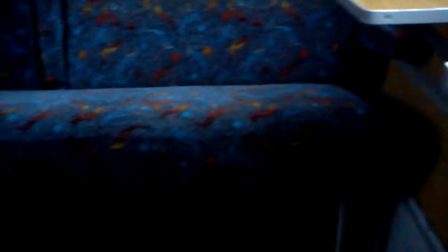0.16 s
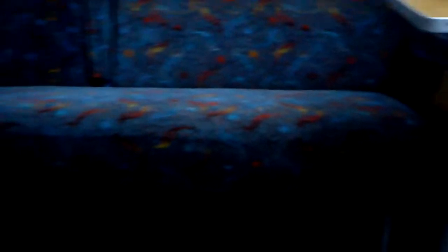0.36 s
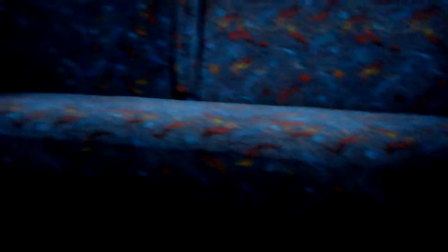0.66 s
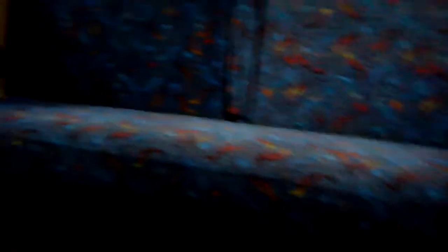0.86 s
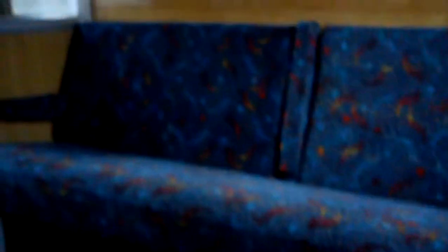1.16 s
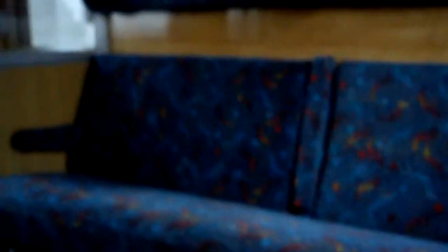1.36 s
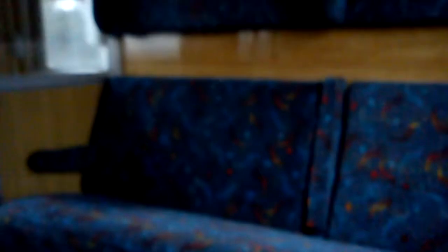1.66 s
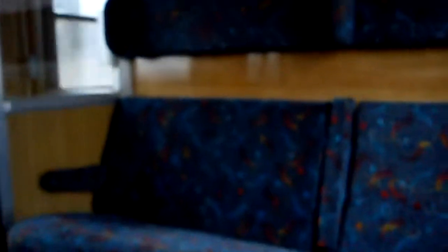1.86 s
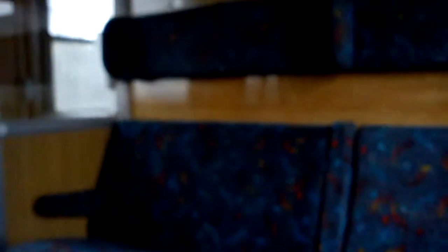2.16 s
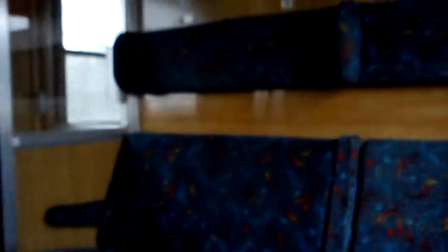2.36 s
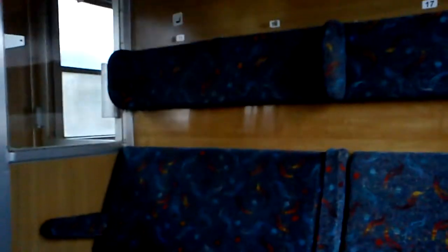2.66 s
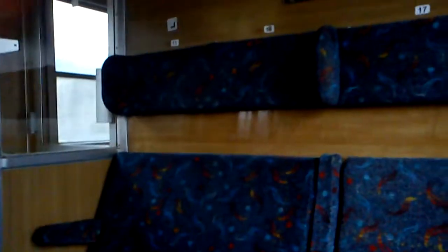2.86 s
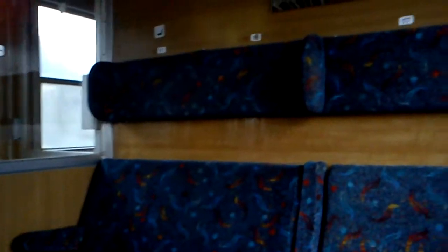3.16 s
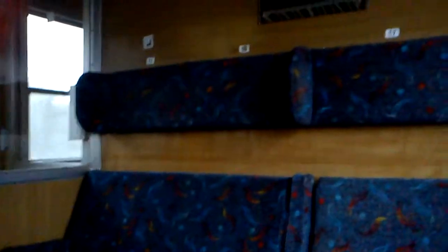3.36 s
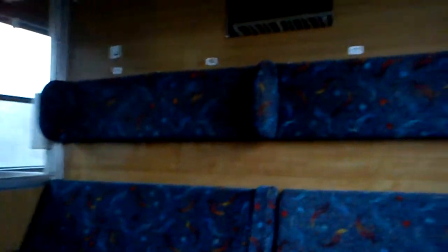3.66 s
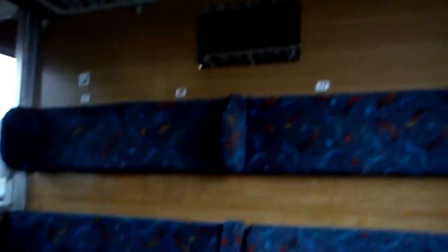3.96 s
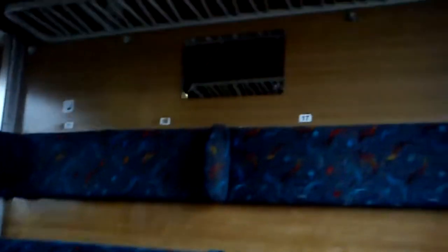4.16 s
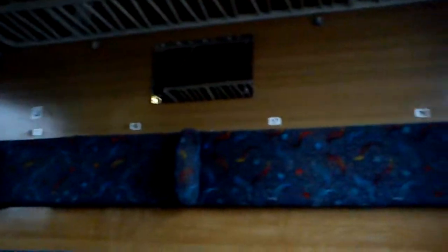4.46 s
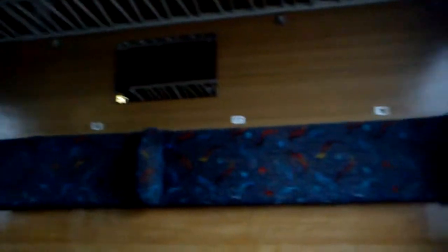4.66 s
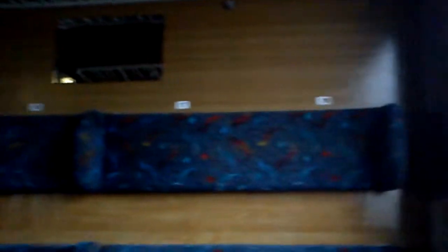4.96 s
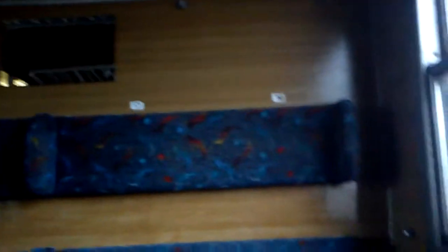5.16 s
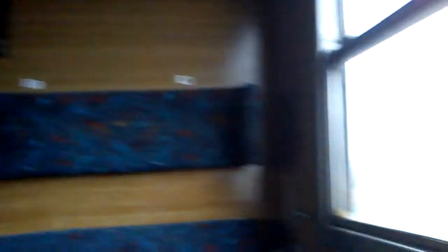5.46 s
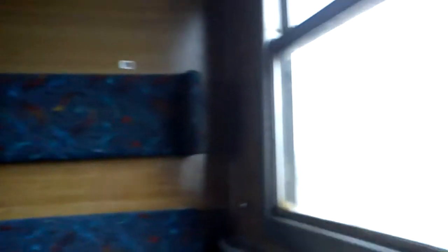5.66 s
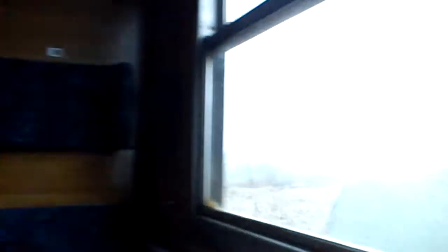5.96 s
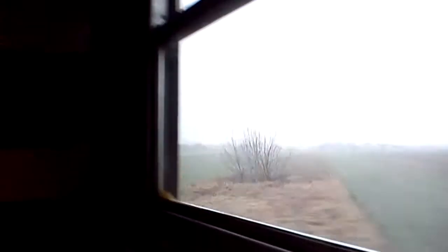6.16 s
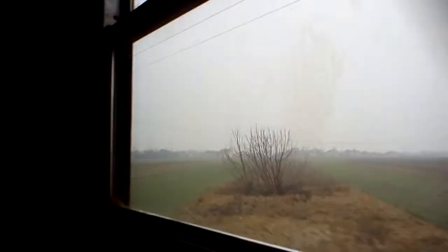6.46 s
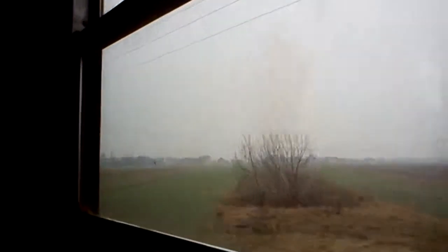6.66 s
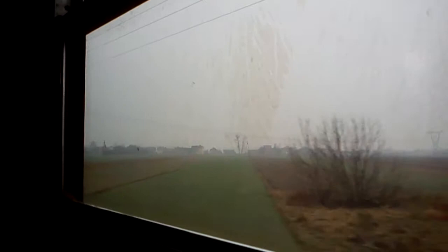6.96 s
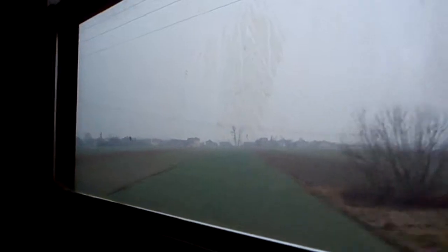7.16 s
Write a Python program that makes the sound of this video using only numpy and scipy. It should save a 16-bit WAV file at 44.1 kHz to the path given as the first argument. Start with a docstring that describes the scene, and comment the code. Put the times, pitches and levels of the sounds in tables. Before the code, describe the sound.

A deep, wavering rumble fills a passenger carriage as steel wheels roar and faintly sing, bogies thud on joints, and close hand rustles appear late.

```python
"""A low, uneven booming fills the compartment of a passenger train running at steady speed.
Jolts drive the carriage body in its low modes (filtered noise and short tones); the wheels roar and
sing on the rails (noise in resonances, wavering tones). Bogies thud over rail joints, mostly about once
a second (decaying partials and a noise knock). Part way through, corrugated rail adds a growl and the
window hiss grows; a few ticks and soft hand rustles sound close by, at a two-port hand-held microphone."""
import sys
import numpy as np
from scipy import signal
from scipy.fft import rfft, irfft
from scipy.io import wavfile
from scipy.ndimage import uniform_filter1d

SR = 44100
rng = np.random.default_rng(int(sys.argv[2]) if len(sys.argv) > 2 else 0)


def to_wav(s):
    """Save 16-bit WAV."""
    ch = np.atleast_2d(s).T  # columns
    pcm = np.round(np.clip(ch, -1, 1) * 32767)  # PCM
    wavfile.write(sys.argv[1], SR, pcm.astype(np.int16))


N = 322812
TIME, HZ = np.arange(N) / SR, np.fft.rfftfreq(N, 1 / SR)

# phase by which the left port leads: f/Hz, phase/rad
PORT_LEAD = [(20, -.2), (120, -.19), (450, -.08), (900, -.05), (1250, .8), (1550, 2.4), (1950, 3.1),
             (2300, 4.7), (2650, 6), (3200, 9.3)]
# level of the left port over the right: f/Hz, level difference/dB
PORT_BALANCE = [(30, 3.8), (85, 2.1), (140, .4), (260, 1.5), (700, .6), (1500, -.2), (2300, -.2),
                (2900, 2.8), (4000, 5), (4700, 2.5), (6000, 11), (7000, 15), (9500, 17)]


def body():
    """Forced vibration: uneven track heaves the sprung carriage and keeps floor and cabin modes rumbling."""
    # spectrum of the heaving body: f/Hz, relative level per Hz/dB
    shudder_spectrum = [(4, -24), (11, -8), (22, -4), (31, -6), (39, 2), (46, -6), (58, -16), (80, -35),
                        (300, -130)]
    # modes of the floor: f/Hz, nominal width/Hz, relative level/dB
    floor_modes = [(67, 8.8, -2.5), (89.2, 17, 2)]
    # drumming of the floor: t/s, level/dB
    floor_level = [(0, -28), (1.9, -34.5), (2.2, -27.5), (2.6, -31), (4.07, -27), (4.58, -32), (5.1, -28),
                   (7.32, -26.5)]
    # low, high and fainter upper modes of the cabin: f/Hz, nominal width/Hz, relative level/dB
    low_modes = [(117.3, 11.7, 1.5)]
    high_modes = [(154.4, 15.3, 0)]
    upper_modes = [(240, 7.2, -10.5), (251, 23, -1.5), (332, 22, -2)]
    # levels of the same three, the lower two between their booms: t/s, level/dB
    low_level = [(0, -30), (.75, -31), (1.12, -32.5), (1.45, -26.5), (2.2, -27), (2.9, -25.5), (3.38, -26),
                 (4.2, -25.5), (5.88, -28), (7.32, -26.5)]
    high_level = [(0, -31.5), (2.4, -32), (2.88, -32.5), (3.68, -35.5), (4.0, -26.5), (4.8, -31.5),
                  (7.32, -27)]
    upper_level = [(0, -47.5), (1.7, -45.5), (3.0, -46), (5.0, -44), (7.32, -48.5)]

    shudder = noise(gain_of(read(shudder_spectrum)), steady=.6, span_s=.2) * gain_of(-28.5)
    drumming = noise(resonances(floor_modes), steady=.6, span_s=.2) * level(floor_level)
    drone = noise(resonances(low_modes), steady=.65, span_s=.2) * level(low_level)
    hum = noise(resonances(high_modes), steady=.65, span_s=.2) * level(high_level)
    upper = noise(resonances(upper_modes), steady=0.44, span_s=0.55) * level(upper_level)
    return shudder + drumming + drone + hum + upper


def booms(length_s=0.066, spread=0.33):
    """Transient modal response: a jolt pumps up one body mode, which swells and dies away."""
    # jolts, as a deep heave or in a cabin mode: t/s of the middle, f/Hz, RMS level at the peak/dB
    jolts = [(.42, 160, -22.5), (.45, 118.7, -17), (0.561, 123.6, -21.5), (0.591, 149.8, -24),
             (0.949, 90.3, -24.5), (1.489, 159, -26.5), (2.06, 118.7, -22.5), (2.16, 38, -21.5),
             (2.37, 90.3, -24), (2.43, 124, -21), (2.44, 155, -24), (2.648, 120, -24), (3.121, 37.2, -22),
             (3.33, 157, -19.5), (3.35, 178, -29.5), (4.15, 183, -30), (3.648, 117, -21.5),
             (3.802, 118.4, -25.5), (3.871, 38.5, -22), (3.951, 115.5, -21.5), (4.21, 39.4, -21.5),
             (4.429, 39.8, -22), (4.679, 38.8, -23), (5.13, 40.8, -24), (5.17, 162, -21.5),
             (5.22, 116.4, -22.5), (5.479, 145.6, -21.5), (5.54, 40, -21), (5.592, 119.3, -20.5),
             (5.59, 152.5, -20), (6.031, 40.4, -21.5), (6.11, 163, -24), (6.28, 118, -22),
             (7.01, 121, -18.5), (7.13, 39.7, -17.5), (7.22, 146.5, -21)]
    out = np.zeros(N)
    for (s, hz, db), turn in zip(jolts, rng.random(len(jolts))):
        near = abs(TIME - s) < .5
        t = TIME[near] - s
        # length_s holds at 100 Hz; deeper booms last longer
        age = t / length_s * (hz / 100) ** spread
        tone = np.sin(2 * np.pi * (hz * t + turn))
        out[near] += gain_of(db) * tone * np.exp(-2 * age ** 2)
    return np.sqrt(2) * ports(out)


def rolling():
    """Roughness excitation: steel rolling on steel gives a broad roar in which rails and wheels ring."""
    # spectrum of the roar: f/Hz, relative level per Hz/dB
    roar_spectrum = [(100, -14), (200, -14), (260, 1.5), (420, 0), (600, 0), (800, 3), (960, 0.5),
                     (1250, 1), (1650, 1), (2000, -4.5), (2600, -25), (3400, -16), (9000, -110)]
    # ringing of rails and running gear, then of the wheels: f/Hz, nominal width/Hz, relative level/dB
    rail_modes = [(459, 12, 2), (549.4, 6.7, 4), (645, 21, -3.5), (704, 64, -3), (715, 5.1, -2),
                  (751, 18, 3), (782, 3.9, 2), (814, 26, 1), (850, 7.5, 0), (888, 74, -5), (1107, 24, 0.5)]
    wheel_modes = [(1366, 9.9, -5), (1407, 8, -1), (1431, 6.1, 2), (1470, 60, -1.5), (1607, 220, -8.5),
                   (1599, 6, 2.5), (2128, 11, -3.5)]
    # roughness of the rail head, as roar: t/s, relative level/dB
    roughness = [(0, -37), (1.35, -35.5), (1.68, -36.5), (2.0, -34.5), (2.35, -36), (3.5, -34), (5.5, -36),
                 (6.2, -35), (7.32, -36)]
    # how hard the rails ring: t/s, level/dB
    rail_level = [(0, -40.5), (1.6, -42), (3.4, -40), (3.95, -41.5), (4.35, -48), (4.7, -40), (5.4, -44.5),
                  (7.32, -43.5)]
    # how hard the wheels sing: t/s, relative level/dB
    wheel_level = [(0, -41), (.45, -38), (1.0, -40.5), (2.1, -41), (3.5, -44.5), (4.2, -42), (5.0, -41.5),
                   (5.3, -38.5), (7.32, -39)]

    flutter = gain_of(.5 * waver(rate=14))
    roar = gain_of(0.9) * noise(gain_of(read(roar_spectrum)), steady=0.9, span_s=0.36) * flutter
    rails = noise(resonances(rail_modes), steady=0.66, span_s=0.19)
    wheels = gain_of(-1.5) * noise(resonances(wheel_modes), steady=0.97, span_s=0.12)
    return roar * level(roughness) + rails * level(rail_level) + wheels * level(wheel_level)


def wheel_squeals():
    """Modal ringing: single wheel modes sing out for a while as thin tones."""
    # t/s of the start, t/s of the end, f/Hz, relative level/dB
    wheel_tones = [(.08, .58, 1430, -45), (1.1, 3.1, 1407, -49.5), (3.92, 4.75, 1599, -48.5),
                   (4.15, 5.1, 1431, -49.5), (5.16, 5.42, 1431, -43.5), (5.05, 5.85, 1475, -47),
                   (5.05, 6.05, 1464, -46.5), (6.27, 7.45, 1465, -44.5)]
    return gain_of(4.8) * singing(wheel_tones, wander_hz=1.4, flicker_db=5.0)


def rail_tones():
    """Modal ringing: single rail modes ring out for a while as thin tones."""
    # t/s of the start, t/s of the end, f/Hz, relative level/dB
    rail_notes = [(1.75, 2.7, 752, -48), (3.72, 4.32, 765, -46.5), (3.85, 4.18, 721, -46),
                  (4.12, 4.45, 810, -48), (4.4, 5.2, 776, -48), (4.5, 4.92, 766, -45),
                  (4.55, 4.87, 755, -45)]
    return gain_of(3.5) * singing(rail_notes, wander_hz=1.5, flicker_db=2.5)


def singing(notes, wander_hz, flicker_db, fade_s=0.044):
    """Narrow-band resonance: one mode of the steel rings as a tone wavering in pitch and strength."""
    out = np.zeros(N)
    wander = wander_hz * waver(rate=14)
    flicker = gain_of(flicker_db * waver(rate=10))
    # each note takes the wavering from another place
    for (start, end, hz, db), shift in zip(notes, rng.integers(0, N, len(notes))):
        gate = np.clip(np.minimum(TIME - start, end - TIME) / fade_s, 0, 1)
        phase = 2 * np.pi * np.cumsum(hz + np.roll(wander, shift)) / SR
        out += gain_of(db) * gate * np.roll(flicker, shift) * np.sin(phase)
    return ports(out)


def joints(thud_rise_s=0.011, knock_rise_s=0.014, detune=.02, pan_db=3.0):
    """Impact excitation: each axle drops into the rail gap; the bogie frame thuds, the running gear knocks."""
    # axles crossing joints, two to a bogie: t/s, thud level/dB, hard knock level/dB
    axles = [(0.388, -34, -56), (0.471, -25, -55), (2.215, -26, -41), (2.302, -26, -51),
             (3.223, -26.5, -46), (3.305, -23.5, -41), (4.096, -22, -49), (4.161, -25.5, -41),
             (5.07, -24, -35), (5.164, -29, -43), (6.085, -25.5, -41), (6.157, -30.5, -48),
             (6.995, -20, -35), (7.077, -26, -49)]
    # modes of the bogie frame: f/Hz, 60 dB decay time/s, relative level/dB
    bogie_modes = [(166.4, 0.18, 1), (187.7, 0.14, -4), (223.3, 0.15, -3.5), (251.5, 0.26, -2.5),
                   (286.6, .14, -5.5), (359, 0.095, -6.5)]
    # spectrum of the knock: f/Hz, relative level per Hz/dB
    knock_spectrum = [(120, -17), (370, 7), (530, 11), (900, -16), (4000, -69)]

    thuds, t = np.zeros((2, N)), np.arange(SR // 3) / SR
    hz, t60, mode_db = np.transpose(bogie_modes)[:, :, None]
    rise = np.tanh((t / thud_rise_s) ** 2)
    for s, db, _ in axles:
        stray, turn = rng.standard_normal((2, len(bogie_modes), 1))
        partials = np.sin(2 * np.pi * (hz * (1 + detune * stray) * t + turn))
        ring = gain_of(mode_db - 60 * t / t60) * partials
        add(thuds, s, ring.sum(0)[None] * rise, db, pan_db)
    blows = swell([(s, db) for s, _, db in axles], knock_rise_s)
    knocks = blows * noise(gain_of(read(knock_spectrum)), steady=0.44, span_s=.055)
    return thuds + knocks


def corrugation():
    """Roughness excitation: ripples on the rail head make the cabin growl, with a faint hum near 550 Hz."""
    # modes excited: f/Hz, nominal width/Hz, relative level/dB
    growl_modes = [(141.8, 11, 1.5), (167.8, 6.7, 0), (213, 20, -12.5), (553, 12, -21)]
    # the wheels run onto the corrugated stretch between 4.74 and 5.1 s
    ripple = gain_of(np.interp(TIME, (4.74, 5.1), (-39.3, -26.8)))
    return noise(resonances(growl_modes), steady=0.54, span_s=1.0) * ripple


def air():
    """Turbulent flow noise: the slipstream hisses along the window, louder once the microphone faces it."""
    # spectrum of the hiss: f/Hz, relative level per Hz/dB
    hiss_spectrum = [(800, -6.5), (2200, 11.5), (2900, 4), (4100, 4), (5000, -3), (5900, -8.5),
                     (7000, -26.5), (9500, -34.5), (11000, -72.5), (15000, -85.5)]
    away_db, window_db = -44.5, 3
    gusts = gain_of(.35 * waver(rate=12))
    # the microphone turns to the window between 3.7 and 5.2 s
    facing = np.interp(TIME, (3.7, 5.2), (0, 1))
    return noise(gain_of(read(hiss_spectrum))) * gusts * gain_of(away_db + window_db * facing)


def rustles():
    """Sliding friction: skin on the microphone housing gives short swells of fine uneven grains."""
    # hand strokes: t/s of the middle, level/dB, length/s, left over right/dB
    hand_strokes = [(4.61, -57.5, 0.022, -9.5), (5.73, -52, 0.036, 1.5), (5.857, -53, 0.017, 1),
                    (5.938, -58, 0.016, 7), (6.174, -56, 0.022, 9), (6.262, -62, 0.015, 17),
                    (6.364, -63, .03, 18), (6.463, -62, .025, 19), (6.568, -49.5, 0.049, 8),
                    (6.605, -49.5, 0.036, 5.5), (6.79, -60.5, 0.054, 15.5), (6.963, -61.5, 0.083, 18.5),
                    (7.03, -52, 0.038, 14.5)]
    # spectrum of skin on the housing: f/Hz, relative level per Hz/dB
    rub_spectrum = [(1500, -16), (4000, -3.5), (7000, 1), (9800, 1.5), (10800, -16.5), (12000, -31),
                    (15000, -41)]
    envelopes = []
    for side in (1, -1):
        surges = [(s, db + side * pan_db / 2, length_s) for s, db, length_s, pan_db in hand_strokes]
        envelopes.append(humps(surges))
    grip = gain_of(3 * waver(rate=220))
    rub = irfft(rfft(rng.standard_normal((2, N)) * grip) * gain_of(read(rub_spectrum)), N)
    return np.array(envelopes) * rub / rub.std()


def ticks(decay_s=0.0014, ring_db=-17, ring_s=0.016):
    """Light impact: small hard parts touch, each giving a sharp snap and a brief bright ring."""
    # contacts close by: t/s, relative level/dB, centre f/Hz, left over right/dB
    contacts = [(3.885, -42, 5200, -14), (4.024, -43, 5200, -7), (5.3584, -40, 10200, -24),
                (5.371, -51, 9500, -22)]
    out, t = np.zeros((2, N)), np.arange(SR // 20) / SR
    decay = np.exp(-t / decay_s) + gain_of(ring_db) * np.exp(-t / ring_s)
    onset = np.tanh(t / 0.00049)
    for s, db, centre_hz, pan_db in contacts:
        burst = bright(rng.standard_normal((2, len(t))), centre_hz, octaves=0.42)
        add(out, s, burst / burst.std() * decay * onset, db, pan_db)
    return gain_of(-3.0) * out


def gain_of(db):
    """Logarithmic level: decibels to amplitude."""
    return np.exp(np.asarray(db) * np.log(10) / 20)


def read(points):
    """Spectral envelope: a table interpolated over log frequency, at every bin."""
    hz, value = np.transpose(points)
    return np.interp(np.log(HZ + 1), np.log(hz + 1), value)


def level(points):
    """Level history: a curve of t/s, level/dB as a gain at every sample."""
    return gain_of(np.interp(TIME, *np.transpose(points)))


def resonances(modes):
    """Modal superposition: amplitude response of steep-sided resonances added in power."""
    power = 0
    for hz, width, db in modes:
        power = power + gain_of(db) ** 2 / (1 + ((HZ - hz) / (0.68 * width)) ** 2) ** 2
    return np.sqrt(power)


def waver(rate):
    """Random modulation: low-passed noise of unit spread, with its corner at rate in Hz."""
    drift = irfft(rfft(rng.standard_normal(N)) / (1 + (HZ / rate) ** 4), N)
    return drift / drift.std()


def noise(colour, steady=0., span_s=.15):
    """Partial coherence: coloured unit noise at two ports; steady (0-1) calms swells longer than span_s."""
    # likeness of the two ports: f/Hz, coherence 0-1
    port_likeness = [(40, .998), (160, .994), (380, .93), (550, .78), (760, .72), (1050, .44), (1400, .27),
                     (1900, .52), (2200, .3), (3200, .22), (4000, .04)]
    a, b = rng.standard_normal((2, 2 * len(HZ))).view(complex)
    same = np.clip(read(port_likeness), 0, 1)
    tilt = gain_of(read(PORT_BALANCE) / 2)
    right = (same * a + np.sqrt(1 - same ** 2) * b) * np.exp(-1j * read(PORT_LEAD))
    pair = irfft((np.array([a * tilt, right / tilt]) * colour).astype(np.complex64), N)
    # divide by a power of the running loudness
    size = int(span_s * SR / 2) + 1
    power = uniform_filter1d(uniform_filter1d(pair.mean(0) ** 2, size), size)
    pair = pair / power ** (steady / 2)
    return pair / pair.mean(0).std()


def ports(sound):
    """Level and phase differences: one clean sound as it reaches the two ports."""
    tilt = gain_of(read(PORT_BALANCE) / 2)
    return irfft(rfft(sound) * np.array([tilt, np.exp(-1j * read(PORT_LEAD)) / tilt]), N)


def bright(sound, centre_hz, octaves):
    """Band-pass filtering: keeps one bell-shaped stretch of the spectrum on a log-frequency axis."""
    hz = np.fft.rfftfreq(sound.shape[1], 1 / SR)
    bell = np.exp(-.5 * (np.log2((hz + 1) / centre_hz) / octaves) ** 2)
    return irfft(rfft(sound) * bell, sound.shape[1])


def add(mix, s, sound, db, pan_db):
    """Linear superposition: adds a sound at a time, level and side (positive pan_db is left)."""
    part = mix[:, round(s * SR):][:, :sound.shape[1]]
    part += gain_of([[db + pan_db / 2], [db - pan_db / 2]]) * sound[:, :part.shape[1]]


def swell(blows, rise_s):
    """Critically damped envelope: each blow (t/s, level/dB) builds for rise_s and dies away more slowly."""
    age, out = np.arange(SR // 2) / SR / rise_s, np.zeros(N)
    for s, db in blows:
        part = out[round(s * SR):][:len(age)]
        part += gain_of(db) * (age * np.exp(1 - age))[:len(part)]
    return out


def humps(surges):
    """Power addition: envelope of rounded surges (t/s of the middle, level/dB, length/s)."""
    power = 0
    for s, db, length_s in surges:
        fall = np.minimum((2 * (TIME - s) / length_s) ** 2, 20)
        power = power + gain_of(db) ** 2 * np.exp(-fall)
    return np.sqrt(power)


def scene():
    """Linear superposition of everything heard from the seat."""
    carriage = body() + booms()
    track = rolling() + wheel_squeals() + rail_tones() + joints() + corrugation()
    return carriage + track + air() + rustles() + ticks()


def record(dry):
    """Band limitation: a linear-phase low-pass removes what lies above 16 kHz."""
    low_pass = signal.firwin(511, 16000, window=("kaiser", 9), fs=SR)
    return signal.oaconvolve(dry, low_pass[None], "same")


dry = scene()
out = record(dry)
to_wav(out)
```